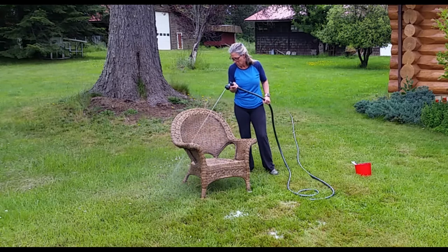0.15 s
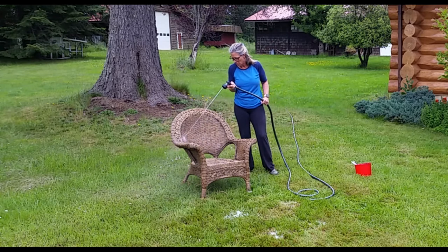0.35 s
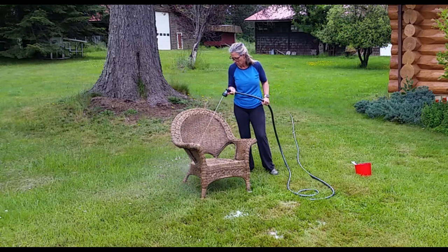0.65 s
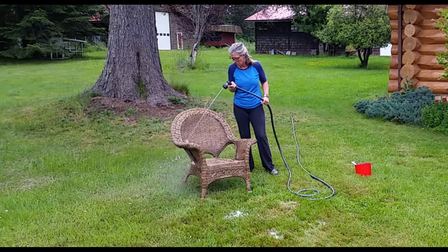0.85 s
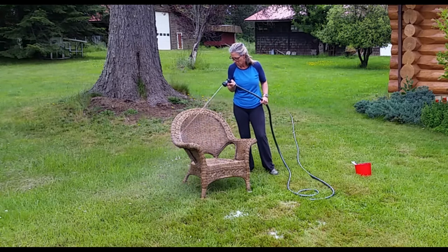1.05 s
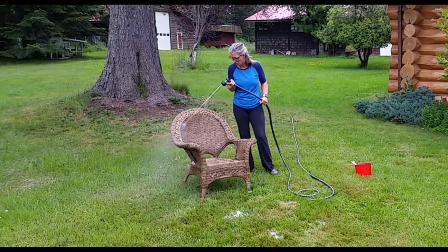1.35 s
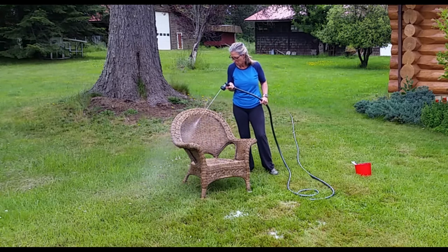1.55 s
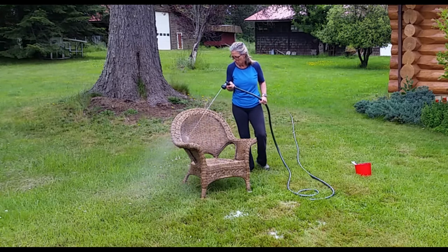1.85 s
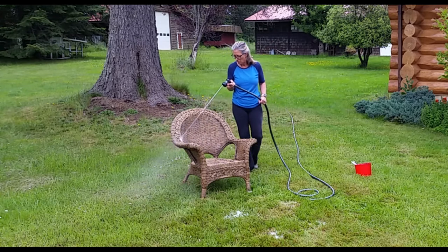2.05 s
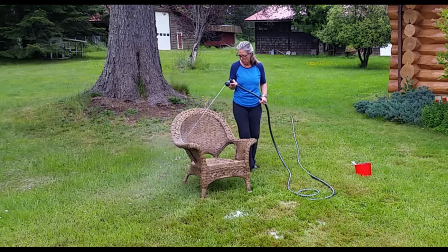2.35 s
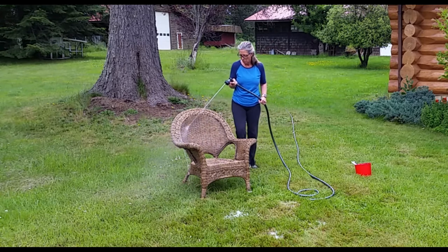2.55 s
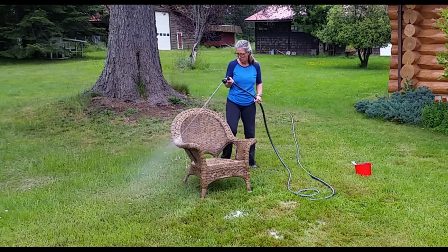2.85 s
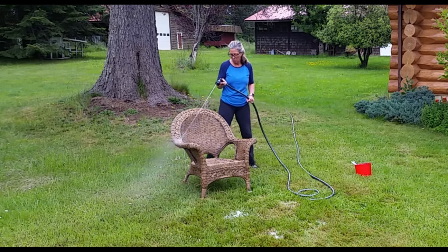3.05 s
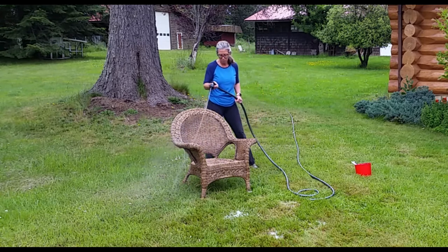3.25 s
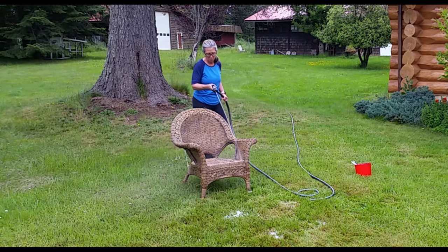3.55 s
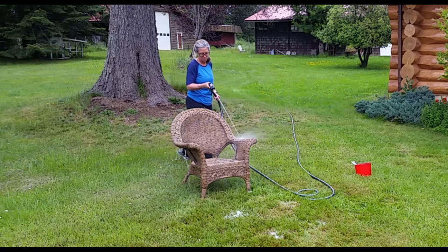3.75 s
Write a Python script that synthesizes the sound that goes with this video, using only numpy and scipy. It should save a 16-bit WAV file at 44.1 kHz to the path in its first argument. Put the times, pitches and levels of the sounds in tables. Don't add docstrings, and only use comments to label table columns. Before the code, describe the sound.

A hose jet sprays a wicker chair on a lawn, hissing and ticking unevenly over a soft hollow thrum, a few metres from a stereo microphone in quiet garden air; it cuts off abruptly at the end.

```python
import sys
import numpy as np
from scipy import signal
from scipy.fft import rfft, irfft
from scipy.io import wavfile

SR = 44100
rng = np.random.default_rng(int(sys.argv[2]) if len(sys.argv) > 2 else 0)


def store_wav(level_fs):
    pcm = np.round(np.clip(np.atleast_2d(level_fs), -1, 1) * 32767)
    wavfile.write(sys.argv[1], SR, pcm.T.astype(np.int16))


def volts_from_db(level):
    exponent = np.asarray(level, float) / 20
    return 10 ** exponent


N = 171990
PORT_LAG = 4
BODY_LIKENESS, BODY_RIGHT_DB = 0.97, 2


def rms_one(x):
    return x / np.sqrt(np.mean(x ** 2) + 1e-20)


def bumps(rows):
    sharpness = 3.2
    t = np.arange(0, N + 64, 64) / SR
    db = sum(change * np.exp(-0.5 * np.abs((t - s) / width) ** sharpness) for s, width, change in rows)
    return np.interp(np.arange(N) / SR, t, db)


def drift(rate):
    r = np.exp(-80 * np.pi * rate / SR)
    noise = rng.standard_normal(N // 40 + 2002)
    slow = signal.lfilter([1], [1, -2 * r, r * r], noise)[2000:]
    return np.interp(np.arange(N) / 40, np.arange(len(slow)), rms_one(slow))


def at_hz(points, column=1):
    p = np.array(points)
    hz = np.maximum(np.linspace(0, SR / 2, 1025), 5.0)
    level = np.interp(np.log(hz), np.log(p[:, 0]), p[:, column])
    return level + 9 * np.minimum(np.log2(hz / p[0, 0]), 0)


def colour(x, db):
    c = irfft(db * np.log(10) / 20)
    c = np.r_[c[0], 2 * c[1:1024], c[1024], np.zeros(1023)]
    return signal.fftconvolve(x, irfft(np.exp(rfft(c))))[:N]


def resonate(x, hz, r):
    return signal.lfilter([1, 0, -1], [1, -2 * r * np.cos(2 * np.pi * hz / SR), r * r], x)


def clicks(rate, spread, smooth):
    sizes = volts_from_db(spread * np.minimum(rng.exponential(1, N), 4.2)) * rng.choice([-1, 1], N)
    impacts = rms_one(sizes * (rng.random(N) < rate / SR))
    smooth = np.clip(smooth, 0, 1)
    return np.sqrt(1 - smooth) * impacts + np.sqrt(smooth) * rng.standard_normal(N)


def ports(make, alike, lag):
    both, alike = make(), np.clip(alike, 0, 1)
    return [np.sqrt(alike) * np.roll(both, k) + np.sqrt(1 - alike) * make() for k in (0, lag)]


def lean_right(pair, db):
    return pair * volts_from_db(np.array([[-0.5], [0.5]]) * db)


def jet_on_strands():
    # (centre_s, width_s, change_db)
    crossings = [(0.0, 0.021, 3.5), (0.05, 0.022, -11.5), (0.115, 0.013, 6.5), (0.19, 0.023, 3.5),
                 (0.239, 0.012, 1), (0.274, 0.046, -14), (0.459, 0.038, 3.5), (0.614, 0.085, -4.5),
                 (0.918, 0.031, -4), (0.988, 0.043, 2), (1.053, 0.018, -3.5), (1.362, 0.031, 2.5),
                 (1.661, 0.057, -2.1), (1.886, 0.071, 3), (2.08, 0.032, -4), (2.23, 0.025, -4),
                 (2.444, 0.016, -4), (2.544, 0.015, 4), (2.699, 0.063, -1.5), (2.804, 0.0057, 4),
                 (2.883, 0.025, 4), (3.317, 0.058, -6), (3.337, 0.013, -5.5), (3.382, 0.014, 6.5),
                 (3.442, 0.035, -4), (3.781, 0.015, -1.5)]
    # (centre_s, width_s, change_db)
    easing = [
        (3.85, 0.1, -0.5),
    ]
    return bumps(crossings + easing) + 0.5 * drift(11.6) + 0.91 * drift(190.0)


def jet_on_frame():
    # (centre_s, width_s, change_db)
    frame_hits = [(0.058, 0.012, -10), (0.15, 0.025, 4.5), (0.275, 0.029, -16), (0.359, 0.034, 3),
                  (0.63, 0.014, -4), (0.918, 0.011, -9), (1.142, 0.044, 1), (1.40, 0.037, -7),
                  (1.52, 0.08, -2.5), (1.66, 0.063, -5), (2.12, 0.066, 1), (2.23, 0.029, -1),
                  (2.34, 0.06, -1), (2.674, 0.024, -2), (2.983, 0.012, -9), (3.133, 0.039, 3.5),
                  (3.248, 0.035, -0.5), (3.335, 0.018, -13), (3.382, 0.014, 2.5), (3.547, 0.12, -3),
                  (3.77, 0.032, 4)]
    return bumps(frame_hits)


def drops():
    # (start_s, peak_db)
    big_drops = [(0.0004, -25.0), (0.0039, -25.0), (0.0077, -25.0), (0.015, -23.0), (0.1107, -18.0),
                 (0.1146, -18.0), (0.1213, -22.0), (0.201, -20.0), (0.4299, -21.0), (0.447, -21.0),
                 (0.4631, -19.0), (0.4866, -21.0), (0.5144, -22.0), (0.5351, -21.0), (0.8274, -22.0),
                 (0.8801, -21.0), (0.9477, -22.0), (0.969, -19.0), (0.974, -20.0), (0.9801, -19.0),
                 (1.2504, -19.0), (1.3437, -20.0), (1.3624, -19.0), (1.5661, -20.0), (1.789, -19.0),
                 (1.8034, -21.0), (1.8892, -20.0), (1.8955, -19.0), (1.9449, -20.0), (1.9638, -21.0),
                 (2.0062, -17.0), (2.1265, -22.0), (2.1927, -22.0), (2.2786, -23.0), (2.5394, -17.0),
                 (2.553, -21.0), (2.8029, -20.0), (2.8067, -20.0), (2.852, -21.0), (2.8553, -20.0),
                 (2.876, -20.0), (2.893, -20.0), (2.9095, -21.0), (2.9128, -21.0), (3.061, -19.0),
                 (3.076, -22.0), (3.1371, -19.0), (3.1412, -20.0), (3.1791, -20.0), (3.3741, -22.0),
                 (3.3854, -22.0), (3.4068, -23.0), (3.5142, -21.0), (3.5263, -22.0), (3.6082, -22.0),
                 (3.6509, -21.0), (3.68, -20.0), (3.8432, -19.0)]
    s, db = np.transpose(big_drops)
    peak = volts_from_db(np.minimum(db, -20) + 40.5)
    start = np.maximum((s * SR).astype(int) - 8, 0)
    splatter = volts_from_db(-9) * rng.uniform(-1.7, 1.7, (len(s), 4))
    out = np.zeros(N + 64)
    out[start] = peak
    for k in range(4):
        out[start + 6 * (k + 1)] += peak * splatter[:, k]
    return out[:N]


def ticks(jet_db):
    # (pitch_hz, level_db per Hz)
    left_colour = [(2500, -23.5), (5000, -45.5), (8100, -30), (10000, -6.5), (11400, 2.5), (12000, 0),
                   (12800, -5.5), (15800, -6)]
    # (pitch_hz, level_db per Hz)
    right_colour = [(2500, -38), (5000, -34.5), (8500, -22.5), (10000, -11.5), (11200, -2), (12200, -5.5),
                    (13500, -4), (15800, -15.5)]
    # (pitch_hz, left_db, right_db)
    arm_tilt = [(5150, 5.5, 15), (9600, -2.5, -5.5), (11300, -0.5, 0.5), (14500, 0, 2)]
    arm_tilt = [(5, *arm_tilt[0][1:])] + arm_tilt
    arm_s, glide_s = 3.486, 0.053
    arm = 1 / (1 + np.exp(-(np.arange(N) / SR - arm_s) / glide_s * 2))
    large = drops()
    out = np.zeros((2, N))
    for lag, weight, tilt in ((PORT_LAG, 1 - arm, 0), (2, arm, 1)):
        pair = ports(lambda: clicks(2500, spread=4.1, smooth=0.36), 0.59, lag)
        place_gain = np.sqrt(weight)
        for k, port_colour in enumerate((left_colour, right_colour)):
            spray = place_gain * volts_from_db(jet_db) * pair[k]
            water = spray + place_gain * np.roll(large, k * lag)
            out[k] += colour(water, at_hz(port_colour) + tilt * at_hz(arm_tilt, column=k + 1))
    return volts_from_db(-25) * out


def rush(jet_db, frame_db):
    # (pitch_hz, level_db per Hz)
    left_colour = [(900, -11), (1500, -2.5), (2200, -1.5), (3200, 1), (3900, -7.5), (4800, -8), (6000, -16),
                   (8500, -19.5)]
    # (pitch_hz, level_db per Hz)
    right_colour = [(900, -3.5), (1500, -4), (2300, -0.5), (3200, 0), (4500, -4), (6200, -0.5),
                    (7500, -6.5), (9500, -10.5)]
    # (centre_s, width_s, change_db)
    splashes = [(.005, 0.02, 9), (.06, .012, 1), (.11, 0.026, 7.5), (.19, 0.037, 8), (.275, 0.042, 0.5),
                (.35, 0.018, 2.5), (.649, 0.03, 5.5), (.85, 0.027, -2), (1.2, 0.48, 2.5), (1.6, 0.13, -2.5),
                (1.871, 0.015, 3), (2.15, 0.083, 2), (2.29, 0.055, 4), (2.4, 0.03, 5.5),
                (2.664, 0.02, -0.5), (2.9, 0.018, 2.5), (3.13, 0.012, 3.5), (3.24, 0.058, 4.5),
                (3.332, 0.015, 1.5), (3.385, .012, 1.5), (3.447, .02, 1.5)]
    # (centre_s, width_s, change_db)
    mist = [(.275, 0.029, -4), (.45, 0.026, 5), (.9, 0.077, -2.5), (1.2, 0.054, -0.5), (1.35, 0.054, 2.5),
            (1.6, 0.11, 0), (1.9, 0.076, 4.5), (2.5, 0.05, 2.5), (2.7, 0.056, -4.5), (2.9, 0.3, 4),
            (3.33, 0.025, -2), (3.45, 0.047, -3), (3.7, 0.037, 3)]
    db = -54.5 + 0.088 * jet_db + 0.052 * frame_db + bumps(splashes)
    db = db + 1.5 * np.linspace(-1, 1, N) + 0.88 * drift(3.55)
    pair = ports(lambda: clicks(9000, spread=1.8, smooth=0.61), 0.59, 5)
    top_end = [(20000, -30)]
    coloured = [colour(x, at_hz(p + top_end)) for x, p in zip(pair, (left_colour, right_colour))]
    spectrum = rfft(rms_one(np.array(coloured)))
    hz = np.linspace(1, SR / 2, N // 2 + 1)
    place = np.clip(3 * np.log2(hz / 900), 0, 11)
    mist_db, mist_from_hz = bumps(mist), 3700
    out = 0
    for k in range(12):
        band = irfft(spectrum * np.maximum(1 - np.abs(place - k), 0), N)
        mist_share = 1 / (1 + (mist_from_hz / (900 * 2 ** (k / 3))) ** 8)
        patches_db = 1.53 * drift(11)
        out = out + volts_from_db(db + mist_share * mist_db + patches_db) * band
    return out


def thrum(frame_db):
    # (pitch_hz, width_hz, level_db)
    body = [(637, 483, -2), (887, 576, 3), (1103, 607, -1.5), (1873, 120, -10.5)]
    pair = np.array(ports(lambda: clicks(1400, spread=2.7, smooth=0.45), BODY_LIKENESS, PORT_LAG))
    out = 0
    for k, (hz, width, db) in enumerate(body):
        r = np.exp(-np.pi * width / SR)
        ring = resonate(pair, hz, r) * (1 - r * r) / 2
        out = out + (-1) ** k * volts_from_db(db + 1.05 * drift(16.3)) * ring
    out = signal.sosfilt(signal.butter(2, [450, 2400], "band", fs=SR, output="sos"), out)
    return lean_right(volts_from_db(-57.5 + 1.4 * frame_db) * rms_one(out), BODY_RIGHT_DB)


def canes():
    # (centre_s, width_s, pitch_hz)
    cane_hits = [(.01, .012, 970), (.015, 0.007, 2920), (.11, 0.0077, 1240), (.11, 0.014, 2100),
                 (.14, 0.012, 790), (.18, 0.017, 1035), (.195, 0.013, 2080), (.17, 0.018, 3100),
                 (.33, 0.012, 1170), (.375, .015, 764), (.47, 0.03, 1300), (.585, 0.011, 770),
                 (.648, 0.0098, 2280), (.672, 0.01, 1160), (.86, 0.026, 770), (1.04, 0.023, 860),
                 (1.13, 0.024, 860), (1.125, 0.012, 1700), (1.25, 0.013, 890), (1.86, 0.013, 2300),
                 (1.92, 0.026, 755), (2.06, 0.024, 990), (2.13, 0.078, 810), (2.29, .012, 415),
                 (2.31, 0.036, 960), (2.345, 0.025, 740), (2.39, 0.024, 1720), (2.48, 0.013, 784),
                 (2.759, 0.0094, 620), (2.809, 0.011, 735), (2.93, 0.052, 990), (3.13, 0.014, 820),
                 (3.13, 0.0073, 2760), (3.22, 0.014, 2440), (3.225, 0.015, 1140), (3.245, 0.034, 1860),
                 (3.275, 0.0098, 910), (3.385, 0.015, 1470), (3.58, 0.023, 2800), (3.745, 0.026, 930),
                 (3.795, 0.012, 870), (3.745, 0.0084, 1880), (3.81, 0.011, 1850)]
    cane_levels = [-55.5, -67, -48.5, -52, -54, -45, -58, -54.5, -62, -60, -59, -52, -53, -60, -62, -64,
                   -55, -60, -60, -66, -61, -62, -57, -56.5, -54, -55.5, -54, -55.5, -58, -53, -59.5, -52.5,
                   -51, -54, -54, -52.5, -55.5, -52, -56, -51.5, -54, -53, -53]
    pair = np.array(ports(lambda: clicks(900, spread=2.7, smooth=0.36), BODY_LIKENESS, PORT_LAG))
    out = np.zeros((2, N))
    for (s, w, hz), db in zip(cane_hits, cane_levels):
        first = max(int((s - 3 * w) * SR), 0)
        last = min(int((s + 3 * w + 0.01) * SR), N)
        t = np.arange(first, last) / SR
        ring = pair[:, first:last] * np.exp(-0.5 * np.abs((t - s) / w) ** 3)
        r = np.exp(-np.pi * (230 + 0.14 * hz) / SR)
        for _ in range(2):
            ring = resonate(ring, hz, r)
        out[:, first:last] += volts_from_db(db) * ring / np.sqrt(np.sum(ring ** 2) / (4 * w * SR))
    return lean_right(out, BODY_RIGHT_DB)


def garden():
    # (pitch_hz, level_db per Hz)
    air_colour = [(25, -8.5), (50, -4.5), (82, 1), (215, -5), (400, -6), (1000, -20), (3000, -14.5),
                  (15000, -45.5)]
    # (centre_s, width_s, change_db)
    swells = [
        (.15, 0.028, 17.5),
        (.48, 0.095, 17),
        (2.3, 0.026, -8),
        (2.49, 0.031, 17),
    ]
    pair = ports(lambda: rng.standard_normal(N), 0.49, 0)
    air = rms_one(np.array([colour(x, at_hz(air_colour)) for x in pair]))
    swell_hz, width_hz = 227.6, 90
    edges = [swell_hz - width_hz / 2, swell_hz + width_hz / 2]
    band = signal.butter(2, edges, "band", fs=SR, output="sos")
    swell = rms_one(signal.sosfilt(band, rng.standard_normal(N)))
    return lean_right(volts_from_db(-58) * air + volts_from_db(-75 + bumps(swells)) * swell, 1.4)


def scene():
    jet_db, frame_db = jet_on_strands(), jet_on_frame()
    water = ticks(jet_db) + rush(jet_db, frame_db)
    chair = thrum(frame_db) + canes()
    return water + chair + garden()


def roll_off(x):
    return signal.sosfilt(signal.butter(12, 17080, fs=SR, output="sos"), x)


def record(dry):
    low_pass = signal.ellip(14, 0.2, 75, 15750, fs=SR, output="sos")
    dull = signal.sosfilt(low_pass, dry)
    stop_s, fade_s, after_db, after_t60_s = 3.887, 0.00071, -63, 0.014
    t = np.arange(N) / SR
    remains = volts_from_db(after_db - 60 * np.maximum(t - stop_s, 0) / after_t60_s)
    on = np.clip((stop_s - t) / fade_s, remains, 1)
    offset = -0.0006
    return roll_off((dull + offset) * on)


dry = scene()
out = record(dry)
store_wav(out)
```